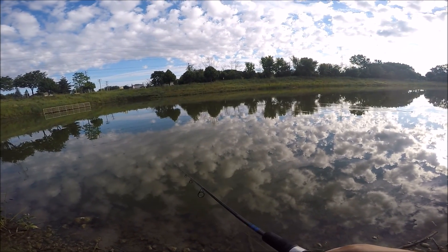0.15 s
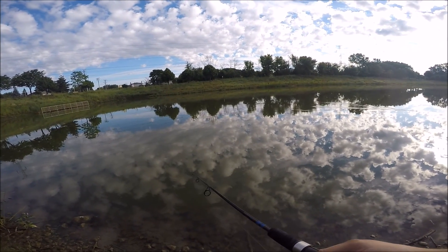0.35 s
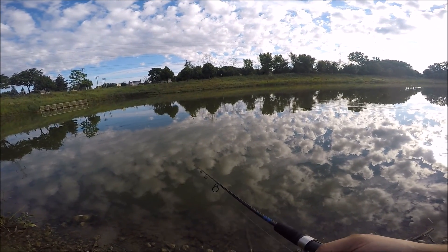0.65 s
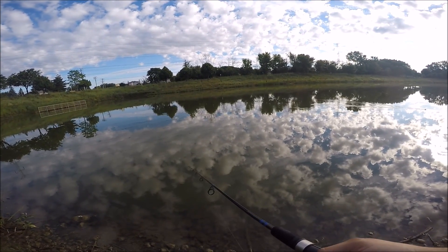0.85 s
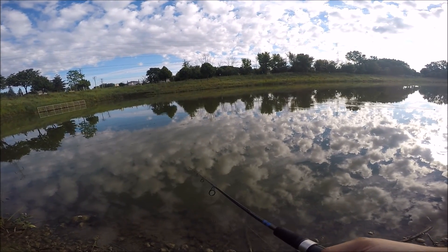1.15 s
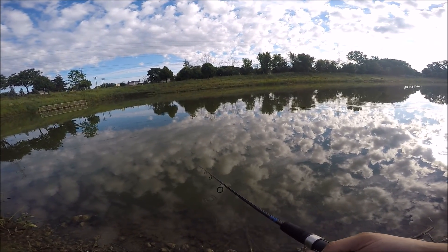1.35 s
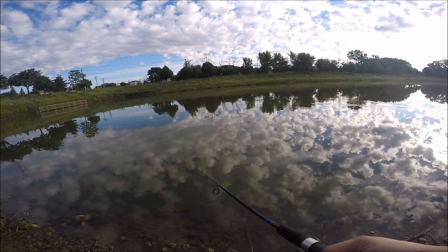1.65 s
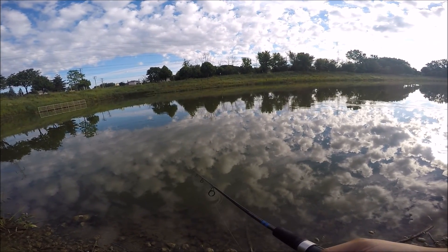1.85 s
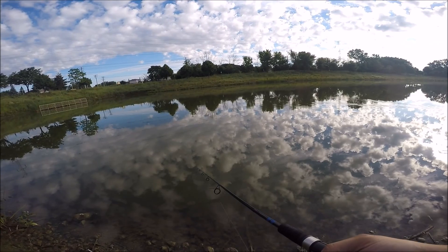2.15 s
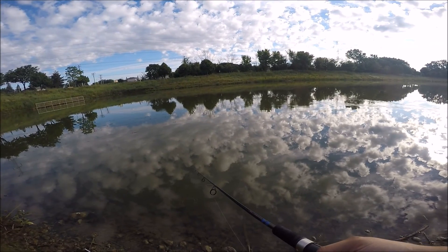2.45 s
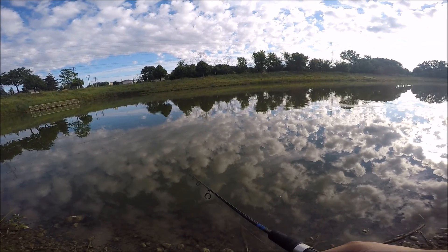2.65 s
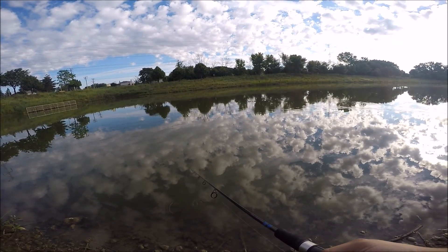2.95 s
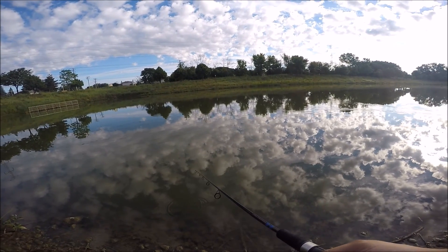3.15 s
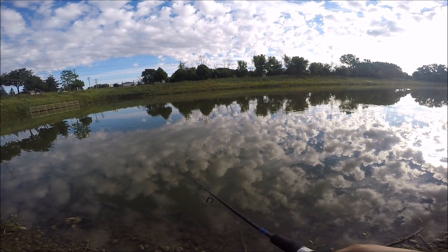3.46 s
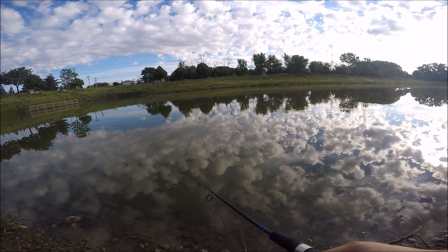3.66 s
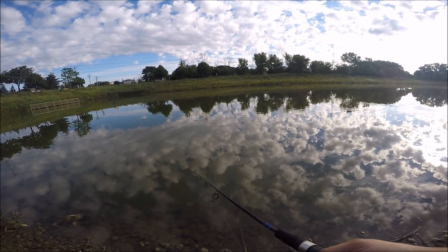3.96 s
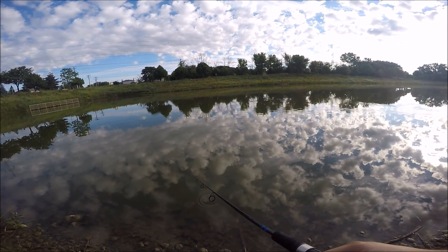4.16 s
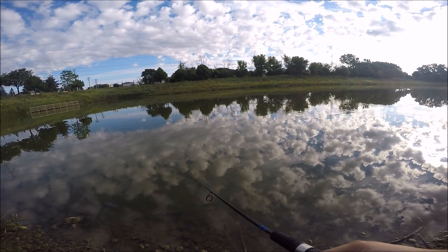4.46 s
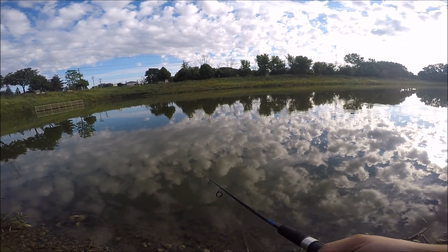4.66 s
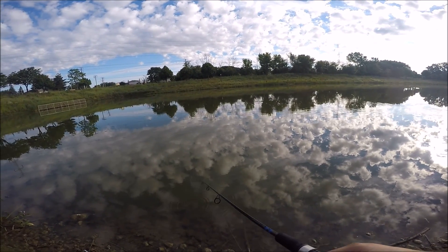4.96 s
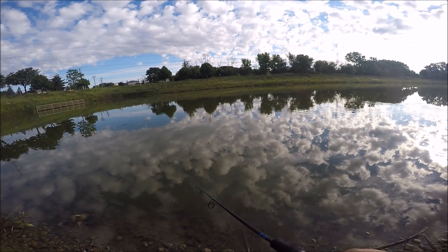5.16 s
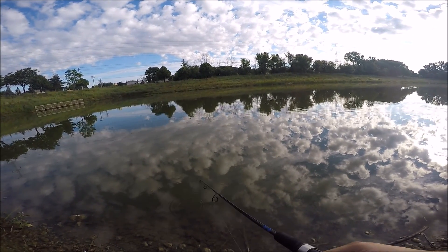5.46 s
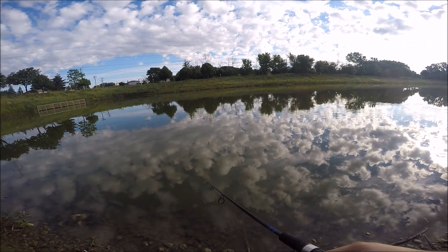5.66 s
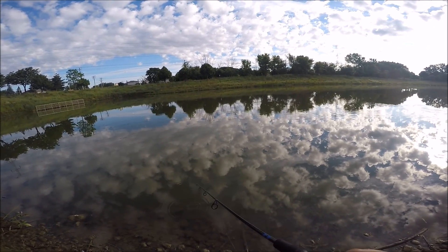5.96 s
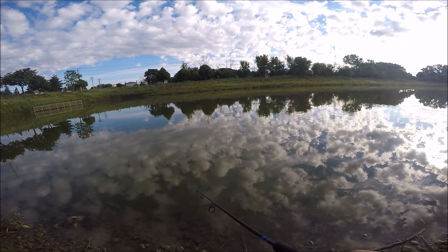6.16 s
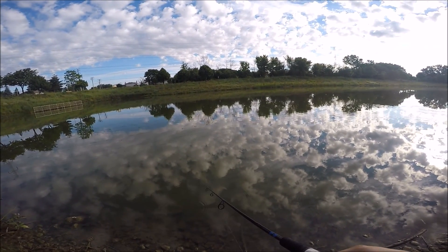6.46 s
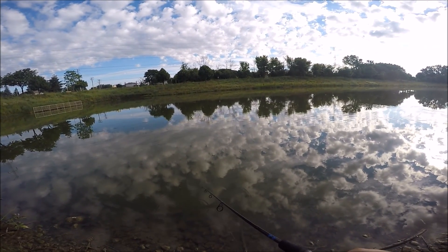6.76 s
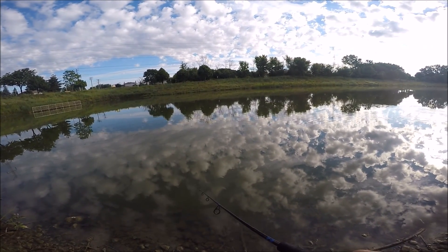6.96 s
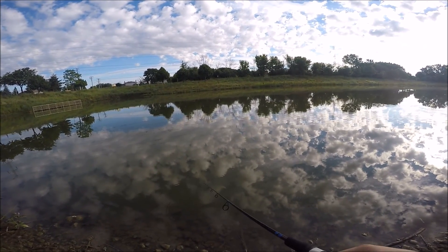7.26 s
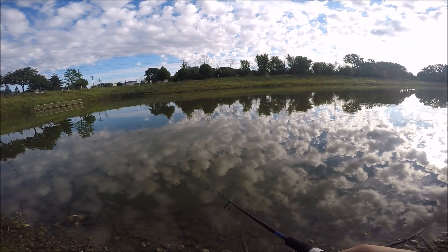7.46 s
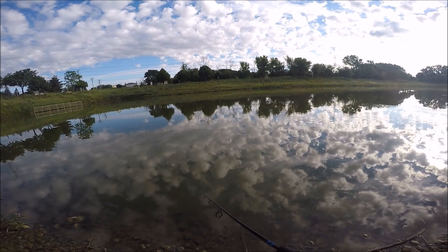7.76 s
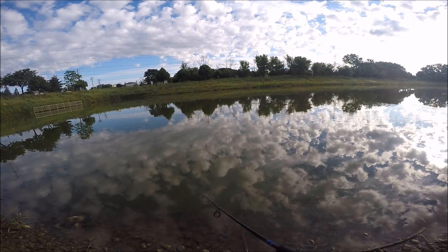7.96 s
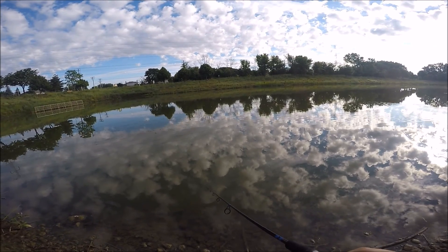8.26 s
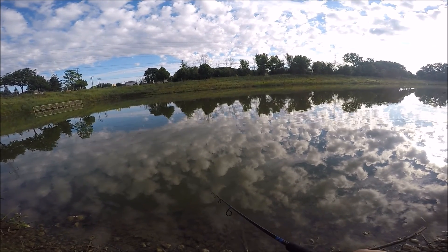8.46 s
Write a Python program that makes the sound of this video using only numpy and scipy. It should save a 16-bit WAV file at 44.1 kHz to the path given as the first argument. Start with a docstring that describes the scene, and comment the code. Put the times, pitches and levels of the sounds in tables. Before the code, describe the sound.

Beside a pond, a faint, high chorus of crickets shimmers steadily, with thin buzzy trills repeating within it. A bird gives a quick falling call five times, about two seconds apart, and others add faint whistles. A fishing rod ticks a few times, loudest near the middle. Light wind rumbles on the microphone over soft hiss and distant traffic, and a low engine hum grows toward the end.

```python
"""A steady chorus of crickets fills a pond bank in the morning, over low wind and a distant road.
Each wing stroke excites a brief resonance, and many strokes merge into shimmering bands. A few small
crickets repeat thin, buzzy trills; one bird repeats a falling call and others whistle. A fishing rod
ticks in damped modes. The camera adds its own hiss and a faint pulsing whine."""
import sys
import numpy as np
from scipy import signal
from scipy.fft import rfft, irfft, next_fast_len
from scipy.io import wavfile
from scipy.ndimage import map_coordinates

SR = 44100
rng = np.random.default_rng(int(sys.argv[2]) if len(sys.argv) > 2 else 0)


def digitize_waveform(pressure):
    """Quantize a signal to 16-bit integers and store it at the path in sys.argv[1].

    Rows of a 2-D input are taken as channels; values are limited to [-1, 1].
    """
    field = np.atleast_2d(pressure).T
    bounded = np.clip(field, -1, 1)
    quanta = np.round(bounded * 32767).astype(np.int16)
    wavfile.write(sys.argv[1], SR, quanta)


N = 380141

# cricket groups: (pitch [Hz], spread [Hz], stroke rate [1/s], stroke length [s],
# near level [dB], far level [dB])
CRICKET_GROUPS = [(3660, 182, 76, 0.022, -100, -106.5), (4620, 146, 70, 0.014, -72.5, -73),
                  (4484, 233, 110, 0.01, -73, -72), (5247, 258, 160, 0.0097, -75, -72.5),
                  (6257, 163, 220, 0.0056, -77, -72), (6580, 217, 220, 0.0062, -74.5, -75.5),
                  (7290, 240, 120, 0.0072, -82, -87.5)]
# bouts of trills: (start [s], period [s], trills [count], trill length [s], pitch [Hz], level [dB])
TRILL_BOUTS = [(0, .677, 3, .15, 7220, -70.5), (.228, .381, 3, .06, 7240, -69.5),
               (.39, .393, 5, .095, 7430, -73), (2.412, .416, 6, .095, 7490, -71.3),
               (2.494, .648, 2, .125, 7220, -72.5), (3.8, .588, 9, .115, 6740, -71.5),
               (4.16, .69, 2, .13, 7220, -73), (4.953, .455, 4, .1, 7510, -68),
               (6.755, .418, 5, .1, 7590, -67.5)]
# falling calls: (start [s], level [dB], pace [ratio], scatter re direct sound [dB])
BIRD_CALLS = [(.993, -54, 1.02, -8), (2.308, -51.5, 1.04, -4), (4.554, -54, 1, -5),
              (6.219, -55.5, 1.03, -1), (8.04, -55, 1.18, -2)]
# syllables of a call: (delay [s], length [s], mid pitch [Hz], sweep [Hz], end upturn [Hz], level [dB])
CALL_SYLLABLES = [(.001, 0.0102, 4700, 700, 3, -1), (0.01, 0.0216, 4790, -700, -200, 0),
                  (0.03, 0.0215, 3530, -250, 600, -6), (0.063, 0.0207, 3630, 804, 150, -4.5),
                  (.083, 0.0107, 3770, -800, 0, -5), (.097, .009, 3380, -300, -200, -5),
                  (.106, .013, 2720, -100, 350, -7), (.121, 0.0086, 2750, -200, 0, -13)]
# whistles and peeps: (start [s], length [s], top pitch [Hz], level [dB])
BIRD_WHISTLES = [(1.29, .27, 7460, -71), (1.815, 0.036, 2860, -72), (1.83, .26, 7340, -75),
                 (3.992, 0.032, 2950, -69), (4.86, 0.04, 2520, -73), (5.246, 0.016, 2890, -68)]
# ticks of rod and reel: (time [s], level [dB], pitch [Hz], relative handle knock [dB])
ROD_TICKS = [(1.550, -47, 2550, -30), (1.713, -55, 2210, -27), (1.757, -58, 11500, -30),
             (3.908, -41, 1956, -21), (3.911, -39.5, 1780, 1), (3.9115, -57, 10700, -30),
             (6.496, -43.5, 2600, -30), (6.553, -57, 9400, -30), (8.4365, -54, 2000, -28)]
# rod modes: (frequency re tick pitch [ratio], level [dB], t60 [s])
ROD_MODES = [(.55, -45, 0.0033), (.76, -6, 0.0033), (1, 13, 0.0043), (1.16, -23, 0.0054)]
# handle modes: (frequency [Hz], level [dB], t60 [s])
HANDLE_MODES = [(405, 5.5, 0.023), (560, 6.5, 0.01), (950, -0.5, 0.012), (1400, 8, 0.0056)]
# wind buffets on the microphone: (centre [s], half length [s], pitch [Hz], level [dB])
WIND_BUFFETS = [(1.589, 0.015, 50.9, -38.5), (1.926, 0.031, 29, -32), (2.885, 0.035, 45.4, -39.5)]
# engine harmonics: (frequency re firing rate [ratio], level [dB])
ENGINE_ORDERS = [(1, 0), (4, -13)]
# traffic passes: (closest approach [s], time to half power [s], peak level [dB])
DRONE_APPROACH = (1.8, 7.4, -49.5)
ROAR_APPROACH = (4.1, 2.56, -64.5)
TYRE_APPROACHES = [(.5, .9, -68), (2.3, 0.8, -65), (8.25, 0.5, -65)]
ENGINE_APPROACH = (8.2, 1.74, -46.5)
# noise spectra: (frequency [Hz], relative spectral density [dB])
WIND_SPECTRUM = [(10, -15), (22, -5), (42, 1), (60, 0), (85, -4.5), (130, -27), (300, -68)]
TRAFFIC_DRONE_SPECTRUM = [(50, -16), (90, -1), (120, 0.5), (160, -4), (240, -5), (310, -9), (410, -10.5),
                          (500, -16.5), (620, -30), (1200, -53.5)]
TYRE_ROAR_SPECTRUM = [(300, -19.5), (550, -1.5), (750, 0), (1000, -3.5), (1300, -7), (2000, -22.5),
                      (4000, -58)]
TYRE_HISS_SPECTRUM = [(700, -7.5), (1100, -4.5), (1380, -0.5), (1580, -5), (1800, -17), (2600, -35),
                      (5000, -67)]
AIR_SPECTRUM = [(500, -16), (1500, 4), (2200, -1), (2850, 0), (3300, -3.5), (4200, -4), (5800, -2),
                (7500, -5.5), (9000, -22), (15000, -59)]
MIC_HISS_SPECTRUM = [(500, 3.5), (4000, 5.5), (9000, 3.5), (11500, 0.5), (13800, 1.5), (15300, -2)]
# brief dips of the background hiss: (time [s])
HISS_DIPS = [1.425, 2.215, 4.882, 6.012, 8.572]


def cricket_chorus(swell_db=-0.1, shimmer_db=0.4):
    """Incoherent summation: near crickets are heard stroke by stroke, far ones merge into noise bands."""
    field = np.zeros(N)
    for hz, spread_hz, rate, length, near_db, far_db in CRICKET_GROUPS:
        near = amp(near_db) * wing_strokes(hz, spread_hz, rate, length)
        band = filtered(rng.standard_normal(N), lambda f: np.exp(-((f - hz) / (2 * spread_hz)) ** 2))
        far = amp(far_db + shimmer_db * wobble(22)) * unit(band)
        field += (near + far) * amp(swell_db * wobble(4))
    return field


def wing_strokes(hz, spread_hz, rate, length, droop=0.051, uneven_db=3):
    """Stridulation: each stroke rings a wing with a tone that sags in pitch; nearer insects are louder."""
    count = int(rate * N / SR)
    timing, detune, nearness = rng.standard_normal((count, 3)).T[:, :, None]
    start = ((np.arange(count)[:, None] + timing) / rate * SR).astype(int) % N
    t = np.arange(int(length * SR)) / SR
    pitch = (hz + spread_hz * detune) * (1 + droop * (0.5 - t / length))
    envelope = amp(uneven_db * np.clip(nearness, -2, 2)) * np.sin(np.pi * t / length)
    strokes = envelope * tone(pitch)
    samples = start + np.arange(len(t))
    return unit(np.bincount(samples.ravel(), strokes.ravel(), minlength=N)[:N])


def cricket_trills(uneven_db=1.2):
    """Rapid modulation makes a buzz: small crickets repeat a trill, each bout at its own even pace."""
    track = np.zeros(N)
    for start, period, count, length, hz, db in TRILL_BOUTS:
        for k in range(round(count)):
            gain = amp(db + uneven_db * rng.standard_normal())
            add(track, start + k * period, gain * thin_note(length, hz, arch=0.0355, depth=1))
    return scattered(track, t60=0.22, wet_db=-22)


def thin_note(length, hz, arch, depth, flutter_hz=84, rough=0.0054):
    """A note arches in pitch; depth sets a joint modulation of its frequency and amplitude."""
    t = np.arange(int(length * SR)) / SR
    bow = np.sin(np.pi * t / length)
    trough = (1 + np.cos(2 * np.pi * flutter_hz * rng.uniform(0.97, 1.04) * t)) / 2
    jitter = np.interp(t * flutter_hz, np.arange(100), rng.standard_normal(100))
    pitch = hz * (1 - arch * (1 - bow) + depth * (0.006 - 0.055 * trough + rough * jitter))
    return unit(tone(pitch) * np.sqrt(np.abs(bow)) * (1 - 0.75 * depth * trough))


def falling_calls(rasp_db=-13, echo_db=-17, echo_s=0.04):
    """A bird rasps, then its syllables tumble down in three steps; reflection at the bank adds an echo."""
    track = np.zeros(N)
    rasp = noise([(4200, -44), (5200, 0), (5700, -2), (6800, -40)])
    for start, db, pace, wet_db in BIRD_CALLS:
        voice = amp(rasp_db) * rasp * np.exp(-((clock() - start + 0.016) / 0.017) ** 2)
        for delay, length, hz, sweep_hz, upturn_hz, level_db in CALL_SYLLABLES:
            note = amp(level_db) * syllable(length / pace, hz, sweep_hz, upturn_hz)
            add(voice, start + delay / pace, note)
            add(voice, start + delay / pace + echo_s, amp(echo_db) * note)
        track += amp(db) * scattered(voice, t60=0.14, wet_db=wet_db)
    return track


def syllable(length, hz, sweep_hz, upturn_hz, rough=0.03, rough_db=2.0):
    """A whistle swells and fades along a parabolic sweep, roughened by random modulation."""
    u = np.linspace(-1, 1, int(length * SR))
    jitter, flutter = (np.interp(u, np.linspace(-1, 1, 7), row) for row in rng.standard_normal((2, 7)))
    pitch = (hz + sweep_hz * u / 2 + upturn_hz * u ** 2) * (1 + rough * jitter)
    envelope = np.sqrt(2 * np.abs(np.cos(np.pi * u / 2))) * amp(rough_db * flutter)
    return envelope * tone(pitch)


def bird_whistles():
    """Nearly pure tones: small birds give a few smooth whistles and peeps."""
    flock = np.zeros(N)
    for start, length, hz, db in BIRD_WHISTLES:
        add(flock, start, amp(db) * thin_note(length, hz, arch=0.0057, depth=0))
    return scattered(flock, t60=0.2, wet_db=-18)


def rod_ticks(attack_s=0.0006):
    """Impulse response: each tick of the tackle excites damped modes of the rod and its handle."""
    track, t = np.zeros(N), np.arange(SR // 20) / SR
    ring = lambda hz, db, t60: amp(db - 60 * t / t60) * np.sin(2 * np.pi * hz * t)
    knock = sum(ring(*mode) for mode in HANDLE_MODES)
    for start, db, hz, knock_db in ROD_TICKS:
        tick = sum(ring(hz * ratio, level, t60) for ratio, level, t60 in ROD_MODES)
        add(track, start, amp(db) * (tick + amp(knock_db) * knock) * (1 - np.exp(-t / attack_s)))
    return track


def wind(mean_db=-45.5, swing_db=0.66, swell_rate=2.08):
    """Pressure fluctuations of light air rumble at the microphone, with a few brief low buffets."""
    air = amp(mean_db + swing_db * wobble(swell_rate)) * noise(WIND_SPECTRUM)
    for centre, width, hz, db in WIND_BUFFETS:
        envelope = amp(db) * np.exp(-((clock() - centre) / width) ** 2)
        air += envelope * np.sqrt(2) * tone(hz * (1 + 0.113 * wobble(19.7)))
    return air


def road(firing_hz=44.7):
    """Superposition of distant traffic: a drone, tyre noise and the harmonics of one nearing engine."""
    firing = firing_hz * (1 + 0.0121 * wobble(4))
    engine = sum(amp(db + 2.1 * wobble(4.8)) * unit(tone(k * firing)) for k, db in ENGINE_ORDERS)
    roar = passing(*ROAR_APPROACH) * noise(TYRE_ROAR_SPECTRUM)
    hiss_power = sum(passing(*car) ** 2 for car in TYRE_APPROACHES)
    hiss = np.sqrt(hiss_power) * noise(TYRE_HISS_SPECTRUM)
    drone = passing(*DRONE_APPROACH) * noise(TRAFFIC_DRONE_SPECTRUM)
    return drone + roar + hiss + passing(*ENGINE_APPROACH) * engine


def passing(closest_s, half_power_s, db):
    """Spherical spreading: the amplitude of passing traffic falls as one over its distance."""
    return amp(db) / np.hypot(1, (clock() - closest_s) / half_power_s)


def background_hiss(air_db=-66.5, mic_db=-70.5, dip_db=-11):
    """Broadband noise of outdoor air and microphone; its level dips briefly now and then."""
    dip = sum(np.exp(-((clock() - centre) / 0.011) ** 4) for centre in HISS_DIPS)
    hiss = amp(air_db) * noise(AIR_SPECTRUM) + amp(mic_db) * noise(MIC_HISS_SPECTRUM)
    return hiss * amp(dip_db * dip)


def camera_whine(hz=8400, step_hz=45, rise_hz=90, jitter_hz=45, frame_hz=60, db=-78.0):
    """A gated tone: the electronics sing one rising burst per frame, alternately higher and lower."""
    phase = 2 * np.pi * frame_hz * clock()
    burst = np.sqrt(np.maximum(np.cos(phase), 0))
    pitch = hz + step_hz * np.cos(phase / 2) + rise_hz * np.sin(phase) + jitter_hz * wobble(90)
    return amp(db) * unit(burst * tone(pitch))


def scattered(x, t60, wet_db):
    """Scattering from grass, bank and trees adds a decaying tail, at about the same total power."""
    t = np.arange(SR // 2) / SR
    tail = rng.standard_normal(len(t)) * amp(-60 * t / t60)
    echo = signal.fftconvolve(x, tail / np.linalg.norm(tail))[:N]
    return (x + amp(wet_db) * echo) / np.hypot(1, amp(wet_db))


def amp(db):
    """Amplitude ratio of a level in decibels."""
    return 10 ** (np.asarray(db) / 20)


def unit(x):
    """Normalisation to rms 1."""
    return x / np.sqrt(np.mean(x ** 2) + 1e-20)


def clock():
    """Sample times in seconds."""
    return np.arange(N) / SR


def wobble(rate):
    """Smooth random modulation: a spline through rate knots a second."""
    knots = rng.standard_normal(int(rate * N / SR) + 4)
    steps = np.arange(10 * len(knots)) / 10
    return np.interp(clock() * rate, steps, map_coordinates(knots, [steps], mode="nearest"))


def filtered(x, gain):
    """Linear filtering: the spectrum of x times gain(frequency)."""
    size = next_fast_len(N + SR // 4)
    return irfft(rfft(x, size) * gain(np.fft.rfftfreq(size, 1 / SR)), size)[:N]


def noise(spectrum):
    """Coloured noise of rms 1, shaped by (frequency [Hz], level [dB]) points."""
    f, db = np.transpose(spectrum)
    gain = lambda hz: amp(np.interp(np.log(hz + 1), np.log(f), db))
    return unit(filtered(rng.standard_normal(N), gain))


def tone(hz):
    """A sine whose phase is the integral of its frequency."""
    return np.sin(2 * np.pi * np.cumsum(hz, axis=-1) / SR)


def add(track, start_s, sound):
    """Superpose a sound on the track at start_s."""
    start = max(round(start_s * SR), 0)
    part = track[start:start + len(sound)]
    part += sound[:len(part)]


def scene():
    """Superposition of everything heard from the bank, in mono."""
    animals = cricket_chorus() + cricket_trills() + bird_whistles() + falling_calls()
    return (animals + rod_ticks() + wind() + road() + background_hiss() + camera_whine())[None]


def record(dry, top_hz=15350):
    """Ideal low-pass filtering: the camera keeps nothing above its band limit."""
    return filtered(dry[0], lambda hz: hz < top_hz)[None]


dry = scene()
out = record(dry)
digitize_waveform(out)
```